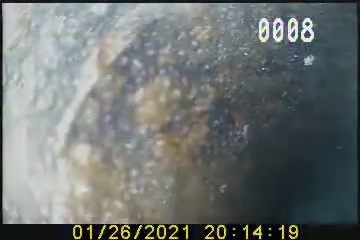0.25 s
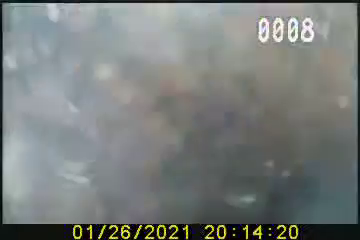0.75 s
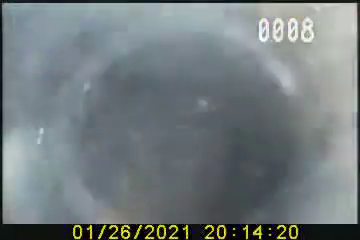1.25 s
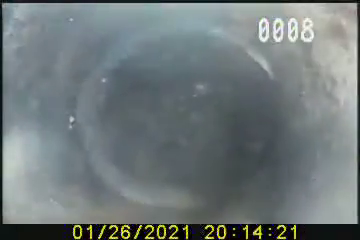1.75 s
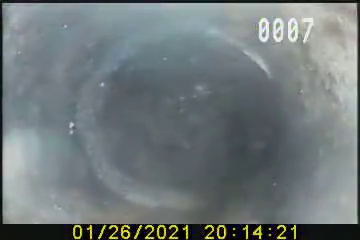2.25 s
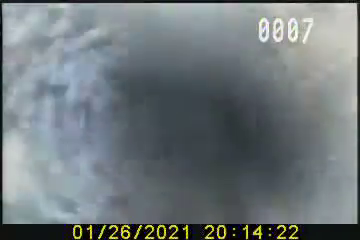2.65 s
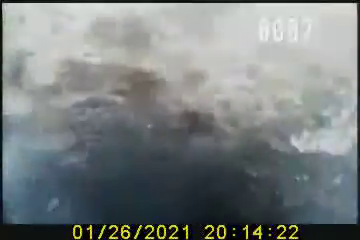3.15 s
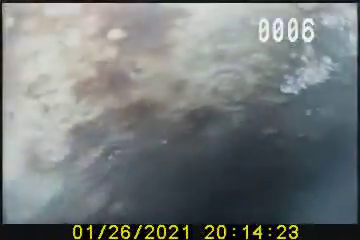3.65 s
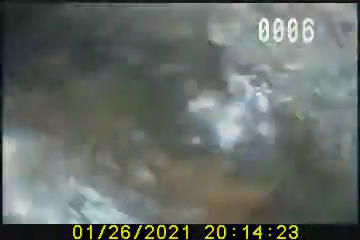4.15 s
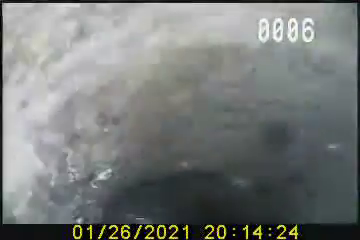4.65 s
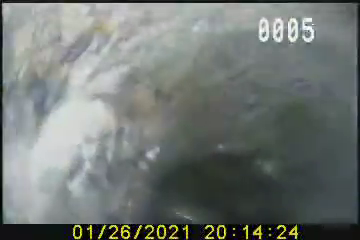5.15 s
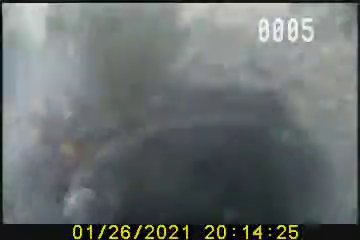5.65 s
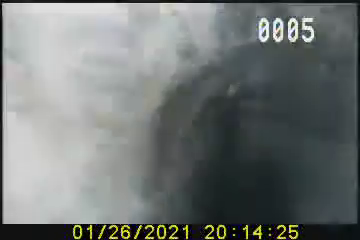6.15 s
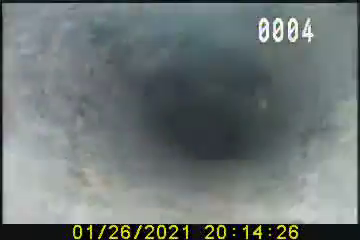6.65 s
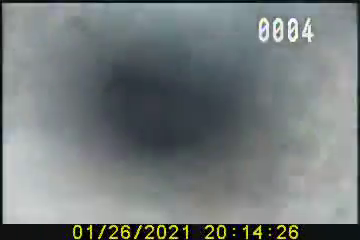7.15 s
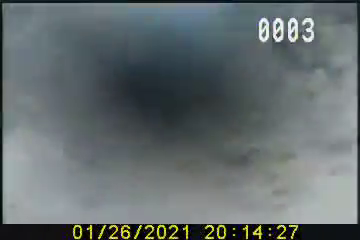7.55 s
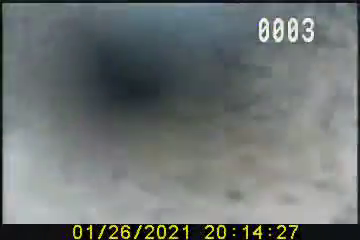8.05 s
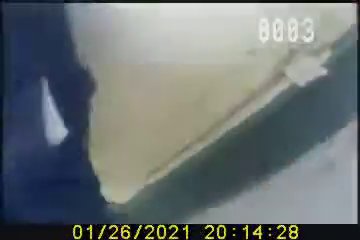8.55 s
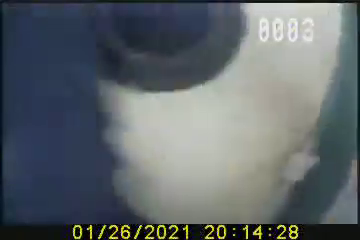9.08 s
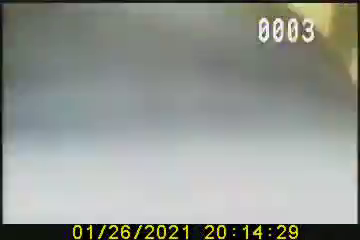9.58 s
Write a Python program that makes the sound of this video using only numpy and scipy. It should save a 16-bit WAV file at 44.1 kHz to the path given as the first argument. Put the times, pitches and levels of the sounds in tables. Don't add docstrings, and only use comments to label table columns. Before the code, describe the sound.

A continuous high electronic whine near 2.2 kilohertz dominates, sounding gritty because its pitch trembles about thirty times a second with a finer buzz on top. Flat hiss lies beneath, sprinkled with tiny crackles and sharper ticks. Brief pitch hiccups come a couple of times a second. No room or pipe sound is heard; everything is inside the camera's wired audio input, mono and dulled at the top.

```python
import sys
import numpy as np
from scipy import signal
from scipy.fft import rfft, irfft, next_fast_len
from scipy.io import wavfile

SR = 44100
rng = np.random.default_rng(int(sys.argv[2]) if len(sys.argv) > 2 else 0)


def master_out(mix):
    frames = np.transpose(np.atleast_2d(mix))
    ceiling = np.clip(frames, -1, 1)
    pcm = np.round(ceiling * 32767).astype(np.int16)
    wavfile.write(sys.argv[1], SR, pcm)


def gain_from_decibels(decibels):
    exponent = np.asarray(decibels, float) / 20
    return 10 ** exponent


N = 433062
FRAME_HZ = 29.977

# (multiple of the whine [1], level [dB rms], lead [cycles])
OVERTONES = [
    (1, -25.7, 0),
    (2, -40.1, .16),
    (3, -49.3, .38),
]


def converter_whine():
    turns = np.cumsum(resting_pitch() + load_pull()) / SR
    wave = np.zeros(N)
    for multiple, level_db, lead in OVERTONES:
        wave += np.sqrt(2) * gain_from_decibels(level_db) * np.cos(2 * np.pi * (multiple * turns + lead))
    frame_swell_db = .085 * cycle(FRAME_HZ, .0188)
    return wave * gain_from_decibels(frame_swell_db)


# (time [s], pitch [Hz])
WARM_UP = [(0.0, 2254.4), (0.89, 2243.1), (1.79, 2241.5), (2.68, 2237.9), (3.57, 2229.0), (4.46, 2227.7),
           (5.36, 2221.5), (6.25, 2216.4), (7.14, 2210.3), (8.03, 2202.0), (8.93, 2202.8), (9.82, 2188.5)]
# (time [s], rise [Hz], width [ms], sag afterwards [Hz])
BURSTS = [(0.065, 30, 22, 17), (0.527, 22, 18, 12), (1.265, 17, 22, 16), (1.961, 53, 16, 16),
          (2.558, 13, 18, 5), (3.228, 14, 18, 12), (3.803, 41, 14, 14), (4.358, 28, 16, 12),
          (4.968, 42, 12, 8), (5.095, 36, 12, 0), (5.495, 20, 22, 11), (5.965, 19, 18, 13),
          (6.565, 40, 12, 17), (7.118, 56, 12, 17), (7.718, 39, 15, 21), (8.234, 3, 12, 33),
          (8.765, 19, 12, 0), (8.854, 15, 12, 10), (9.551, 24, 20, 10), (9.786, 12, 12, 0)]


def resting_pitch():
    recover_s = .15
    t = np.arange(N) / SR
    pitch = np.interp(t, *np.transpose(WARM_UP))
    for s, _, width_ms, sag_hz in BURSTS:
        late = t - s - width_ms / 1000
        pitch -= sag_hz * (late > 0) * np.exp(-np.abs(late) / recover_s)
    return pitch


# (rate [Hz], pitch swing [Hz])
CHORES = [(70, 1.8), (109.9, 2), (179.8, 2.8), (599.3, 1.5)]


def load_pull():
    t = np.arange(N) / SR
    frames = 14 * cycle(FRAME_HZ, .0169)
    frames += 2.6 * cycle(FRAME_HZ, .0128, 2) + 2.4 * cycle(FRAME_HZ, .0086, 3)
    timer = 8.8 * cycle(199.758, .00265) * (1 + .68 * cycle(FRAME_HZ, .0269))
    chores = sum(swing_hz * cycle(hz, rng.random() / hz) for hz, swing_hz in CHORES)
    bursts = sum(rise_hz * 2 ** (-(2000 * (t - s) / width_ms) ** 2) for s, rise_hz, width_ms, _ in BURSTS)
    s, size, _ = scattered(count=4300, frame_share=.45, lag=0)
    jobs = impulses(s, -.0315 * np.log(1 - .94 * size))
    jumps_hz = eased(jobs - jobs.mean(), .001) + eased(surges(), .0022)
    return frames + timer + chores + bursts + jumps_hz


# (time [s], jump ahead [cycles])
SURGES = [(0.8991, 0.148), (2.2512, 0.157), (2.5663, 0.193), (2.5725, 0.228), (2.8206, 0.139),
          (3.2312, 0.165), (3.2385, 0.173), (3.5795, 0.175), (4.0478, 0.152), (4.0527, 0.167),
          (4.3544, 0.16), (4.9554, 0.176), (5.9561, 0.165), (5.9643, 0.203), (5.9751, 0.163),
          (6.7106, 0.281), (6.8958, 0.156), (7.1308, 0.173), (7.7328, 0.167), (8.1379, 0.153),
          (8.2165, 0.187), (8.2187, 0.209), (8.3181, 0.168), (8.3227, 0.211), (8.8531, 0.168),
          (9.0088, 0.155), (9.4639, 0.226), (9.5568, 0.17), (9.6892, 0.179), (9.7243, 0.219)]


def surges():
    pair_gap_s, pair_jump = .004, .105
    least_jump, most_jump = .07, .145
    s, size, _ = scattered(count=85, frame_share=0, lag=0)
    lesser = impulses(s, least_jump + (most_jump - least_jump) * size)
    centres = np.array([burst[0] for burst in BURSTS])
    pair_s = np.r_[centres - pair_gap_s / 2, centres + pair_gap_s / 2]
    pairs = impulses(pair_s, np.full(len(pair_s), pair_jump))
    return impulses(*np.transpose(SURGES)) + pairs + lesser


def eased(jumps, seconds):
    spread = np.hanning(round(seconds * SR))
    return SR * np.convolve(jumps, spread / spread.sum(), "same")


def glitches():
    s, peak_db, spill = downward_ticks()
    down = gain_from_decibels(peak_db) / (1 + .1 * spill)
    drops = impulses(s, down) + impulses(s + 7e-5, spill * down)
    up_s = rng.random(265) * N / SR
    spikes = impulses(up_s, gain_from_decibels(-25.2 + 1.2 * rng.standard_normal(len(up_s))))
    s, size, side = scattered(count=1700, frame_share=.4, lag=.01)
    small = impulses(s, gain_from_decibels(-24.5 - 15 * size ** .5) * np.sign(side - .5))
    return (spikes - drops + small) * SR / (2 * 7600)


# (time [s], peak level [dB])
SHARP_TICKS = [(0.2375, -19.7), (0.3445, -19.8), (0.3875, -19.9), (0.5113, -18.7), (0.6983, -18.4),
               (1.1933, -18.9), (1.7188, -19.3), (2.3793, -18.5), (2.4153, -19.6), (2.6478, -19.2),
               (2.8338, -19.0), (2.8684, -18.9), (3.1384, -19.0), (3.8298, -18.9), (3.8478, -19.8),
               (4.0964, -18.7), (4.1778, -19.1), (4.7609, -17.4), (4.9039, -17.4), (5.0969, -19.2),
               (5.0979, -19.2), (5.3059, -19.0), (6.5775, -19.3), (7.0509, -19.1), (7.5128, -18.1),
               (8.2432, -19.4), (8.7002, -19.7), (8.7048, -18.3), (9.0928, -18.6), (9.6334, -17.7)]
# (time [s], peak level [dB])
THUDS = [(0.2634, -23), (0.271, -23), (0.2975, -19.5), (0.6053, -20), (1.3933, -20.5), (1.6322, -21.5),
         (1.8582, -23), (2.5934, -21.5), (3.8238, -20.2), (4.0914, -20), (4.2368, -20), (5.3253, -20),
         (6.0554, -22.5), (6.6415, -20), (6.6755, -19.8), (7.3755, -21), (7.6849, -19.5), (8.5312, -21),
         (8.8118, -20.5), (9.7464, -17.8)]
# (first time [s], last time [s], how many [count])
FLURRIES = [(.29, .365, 5), (2.017, 2.093, 7), (2.159, 2.17, 3), (3.665, 3.705, 3), (4.118, 4.12, 2),
            (4.392, 4.396, 3), (5.254, 5.262, 3), (5.557, 5.6, 5), (5.77, 5.94, 10), (7.075, 7.085, 2),
            (7.95, 7.986, 4), (8.632, 8.692, 5), (9.034, 9.132, 5)]


def downward_ticks():
    sharp_spill, thud_spill = .1, .8
    flurry_db, lone_db, spread_db = -22, -22.5, 3
    named = np.array([(*row, sharp_spill) for row in SHARP_TICKS] + [(*row, thud_spill) for row in THUDS])
    runs = np.concatenate([np.linspace(first, last, many) for first, last, many in FLURRIES])
    lone_s, size, spare = scattered(count=125, frame_share=0, lag=0)
    draw = rng.random((len(runs), 3))
    run_s = runs + .003 * (draw[:, 0] - .5)
    run_peak_db = flurry_db + spread_db * (2 * draw[:, 1] - 1)
    lone_peak_db = lone_db + spread_db * (2 * size - 1)
    spill = 1.1 * np.r_[draw[:, 2], spare] - .6
    return (np.r_[named[:, 0], run_s, lone_s], np.r_[named[:, 1], run_peak_db, lone_peak_db],
            np.r_[named[:, 2], spill])


# (frequency [Hz], level [dB per Hz])
HISS = [(20, 1), (1500, 2), (3500, 1.5), (6000, 1), (9000, 0)]


def amplifier_hiss():
    return gain_from_decibels(-41.0) * unit(coloured(rng.standard_normal(N), HISS))


# (frequency [Hz], level [dB rms])
CLOCKS = [(2933.9, -73), (3454.5, -69), (3720.2, -73), (5103.6, -71), (7174.6, -76)]


def clock_tones():
    return sum(np.sqrt(2) * gain_from_decibels(level_db) * cycle(hz, rng.random()) for hz, level_db in CLOCKS)


def unit(x):
    return (x - x.mean()) / x.std()


def coloured(x, points):
    m = next_fast_len(N + 8192)
    hz, db = np.transpose(points)
    gain = gain_from_decibels(np.interp(np.log(np.fft.rfftfreq(m, 1 / SR) + 1), np.log(hz + 1), db))
    return irfft(rfft(x, m) * gain, m)[..., :N]


def impulses(s, size):
    return np.bincount(np.clip(np.round(s * SR).astype(int), 0, N - 1), size, N)


def cycle(hz, start=0, multiple=1):
    return np.cos(2 * np.pi * multiple * hz * (np.arange(N) / SR - start))


def scattered(count, frame_share, lag):
    draw = rng.random((count, 4))
    s = draw[:, 0] * N / SR
    thinning = frame_share * (1 + np.cos(2 * np.pi * FRAME_HZ * (s - lag))) / 2
    keep = draw[:, 1] < 1 - thinning
    return s[keep], draw[keep, 2], draw[keep, 3]


def scene():
    return (converter_whine() + glitches() + amplifier_hiss() + clock_tones())[None]


# (frequency [Hz], gain [dB])
BAND = [(6500, 0), (7300, -0.5), (7800, -3.5), (8200, -9), (8600, -19.5), (8900, -32.5), (9150, -40),
        (9400, -63.5), (9800, -120)]


def audio_input(x):
    return coloured(x, BAND) - .0024


def roll_off(x):
    return signal.sosfilt(signal.butter(12, 9250, fs=SR, output="sos"), x)


def record(dry):
    mix = audio_input(dry)
    return roll_off(mix)


dry = scene()
out = record(dry)
master_out(out)
```